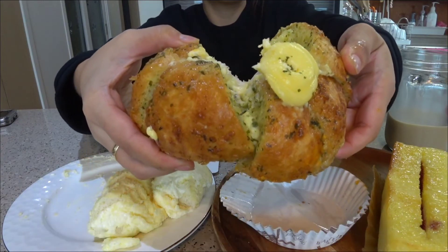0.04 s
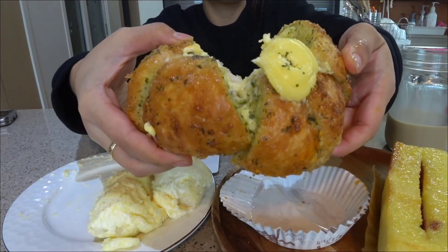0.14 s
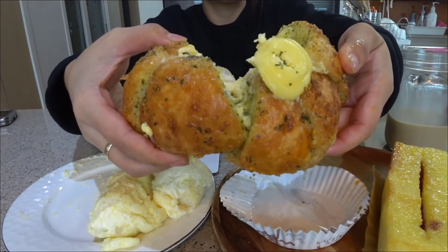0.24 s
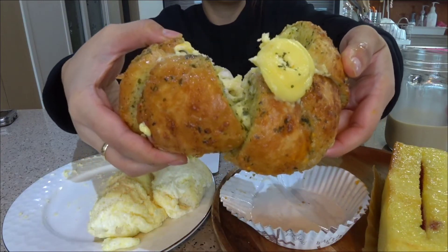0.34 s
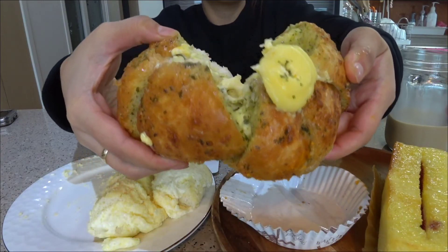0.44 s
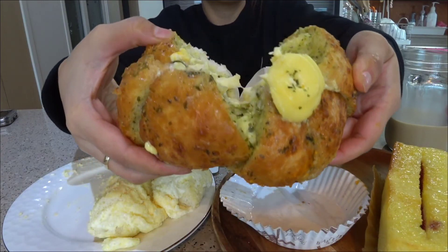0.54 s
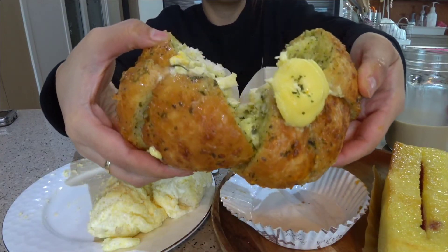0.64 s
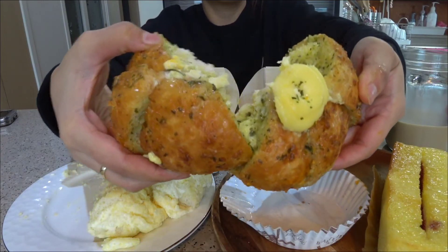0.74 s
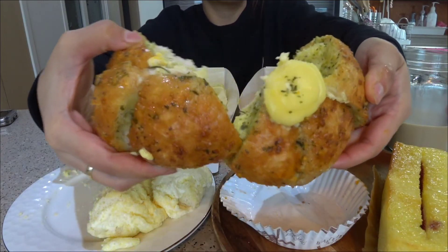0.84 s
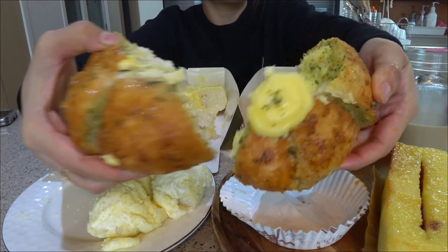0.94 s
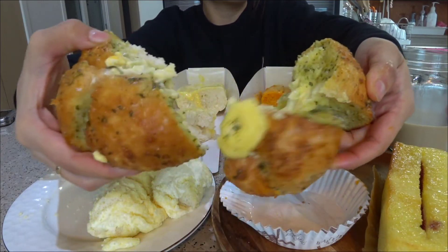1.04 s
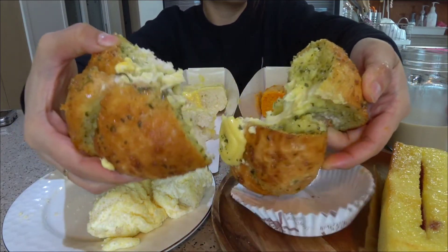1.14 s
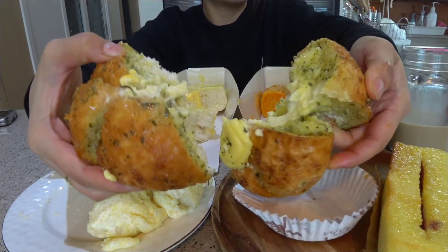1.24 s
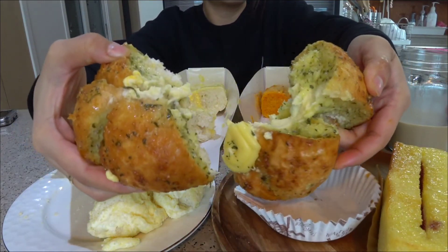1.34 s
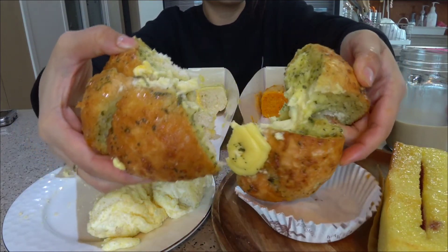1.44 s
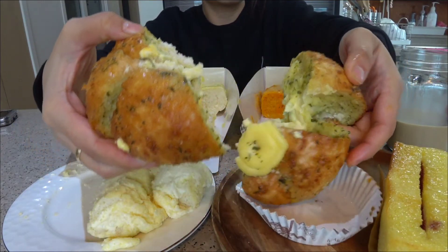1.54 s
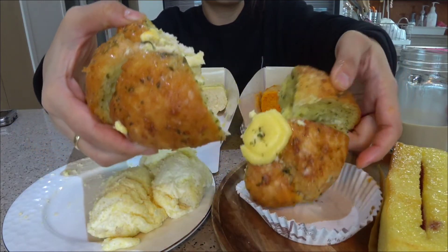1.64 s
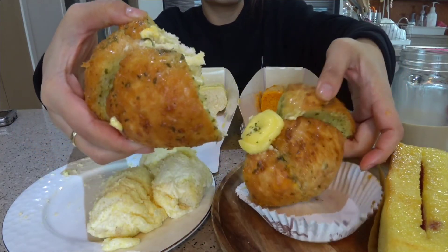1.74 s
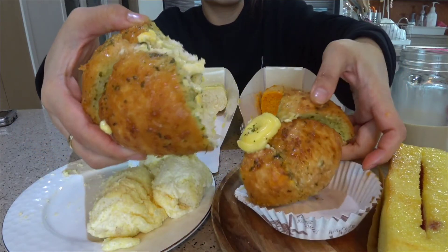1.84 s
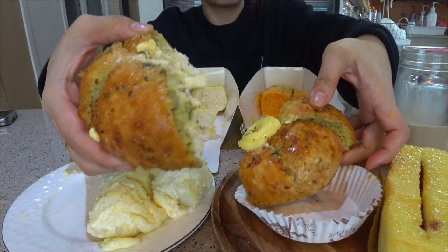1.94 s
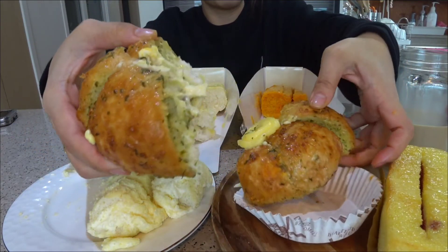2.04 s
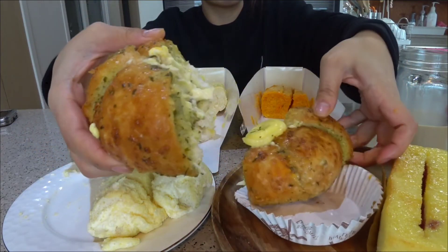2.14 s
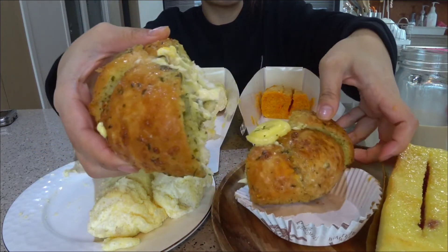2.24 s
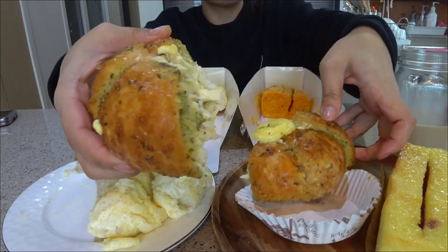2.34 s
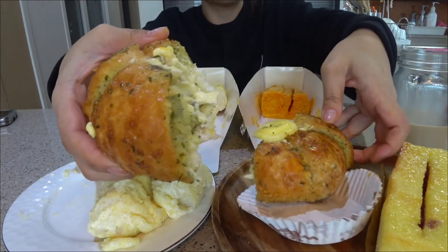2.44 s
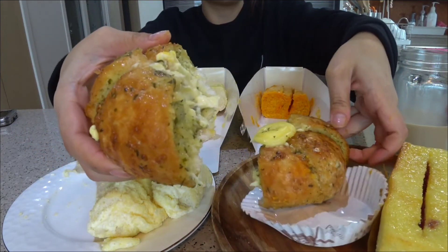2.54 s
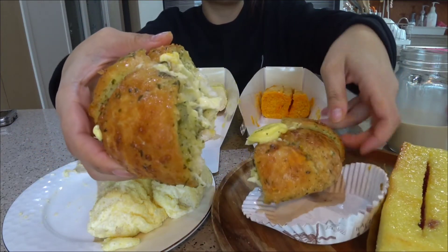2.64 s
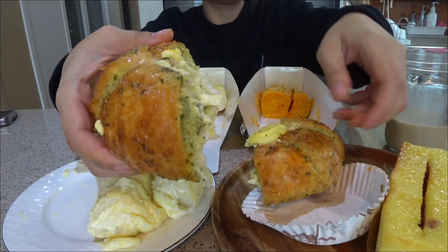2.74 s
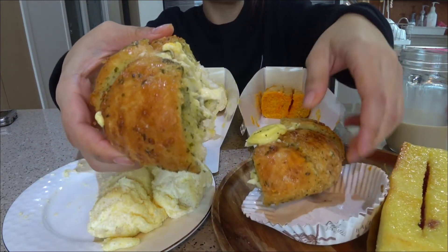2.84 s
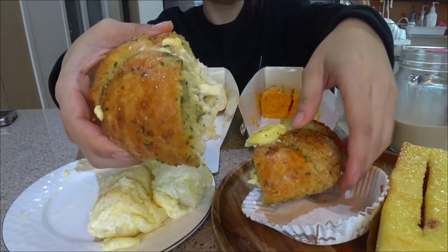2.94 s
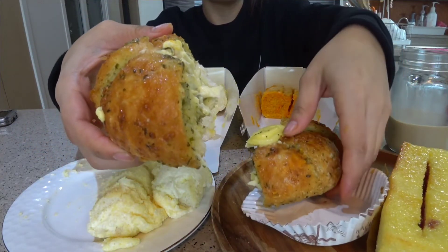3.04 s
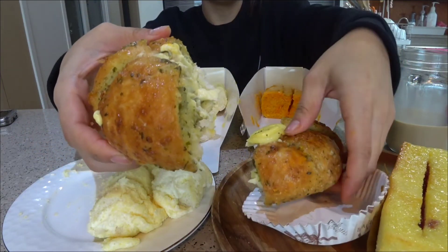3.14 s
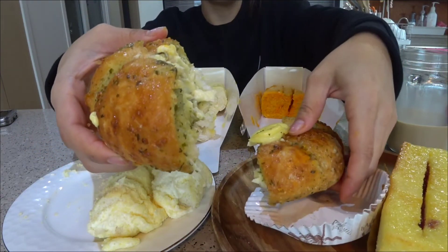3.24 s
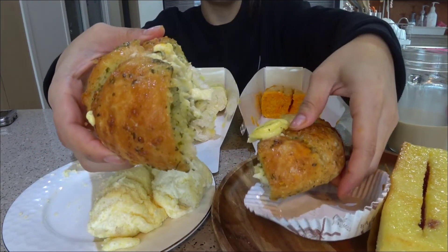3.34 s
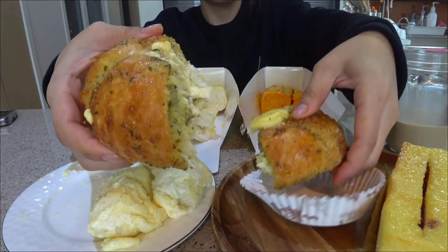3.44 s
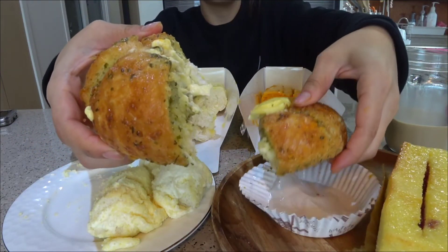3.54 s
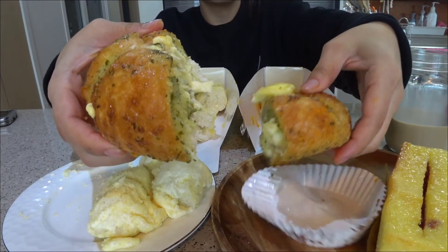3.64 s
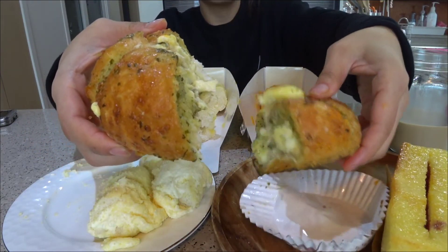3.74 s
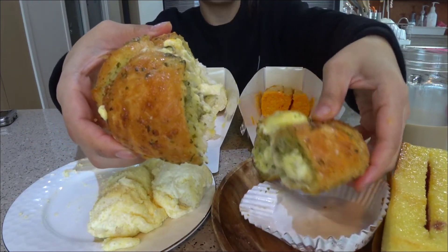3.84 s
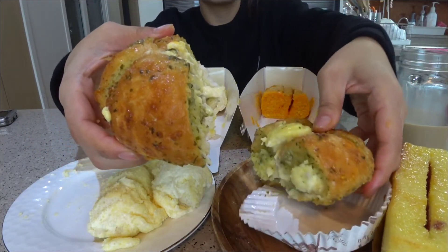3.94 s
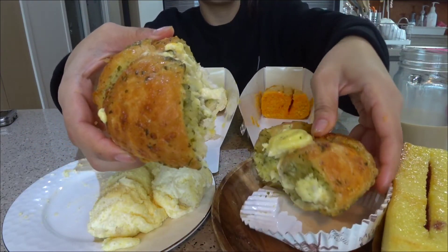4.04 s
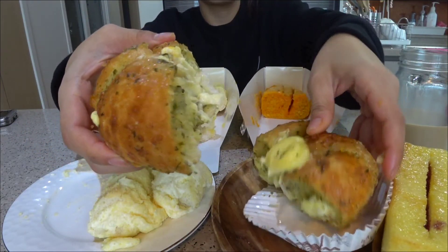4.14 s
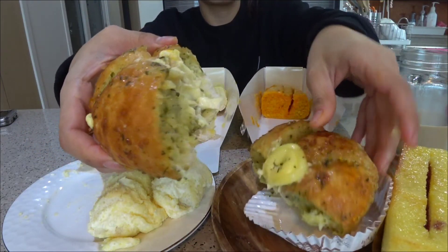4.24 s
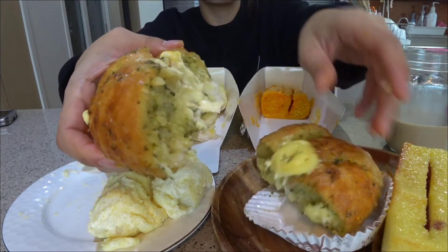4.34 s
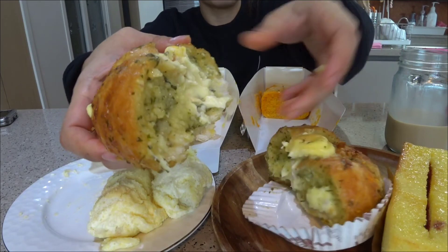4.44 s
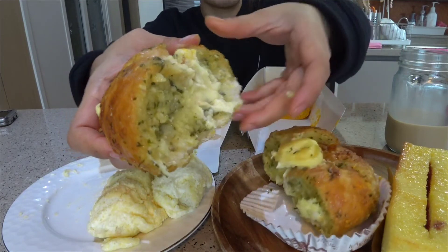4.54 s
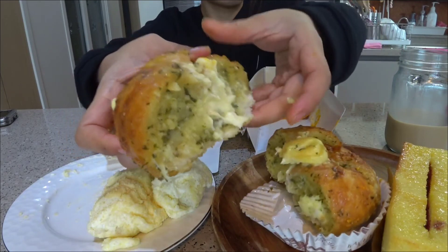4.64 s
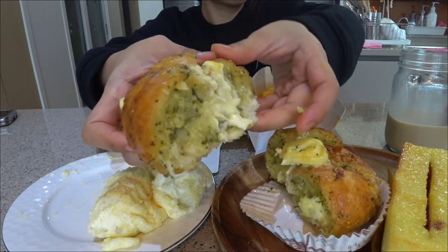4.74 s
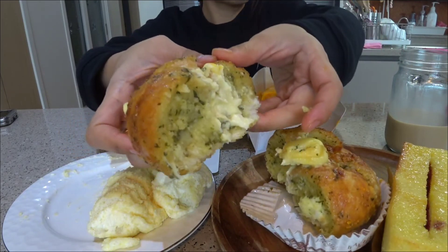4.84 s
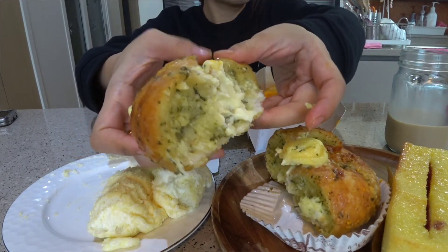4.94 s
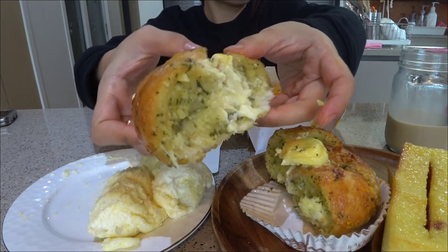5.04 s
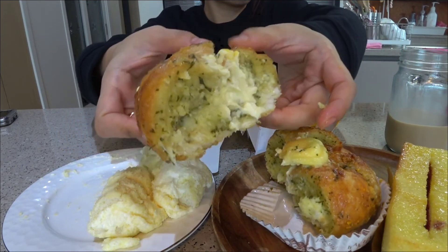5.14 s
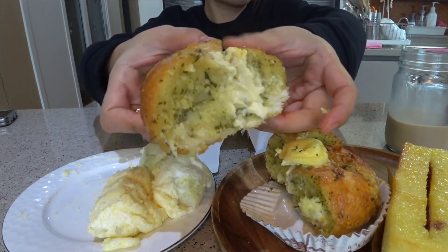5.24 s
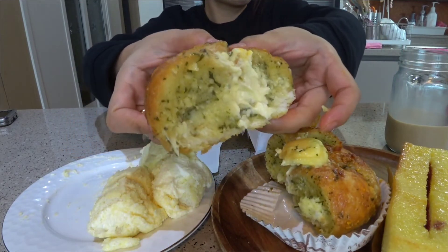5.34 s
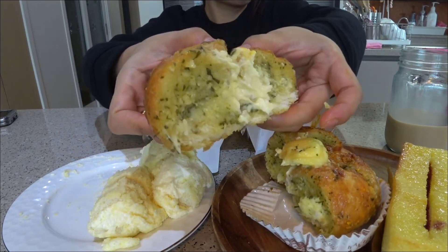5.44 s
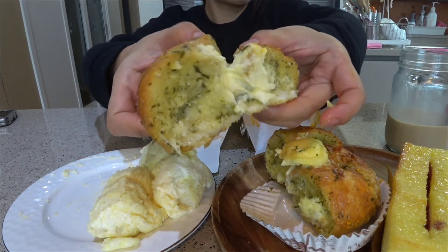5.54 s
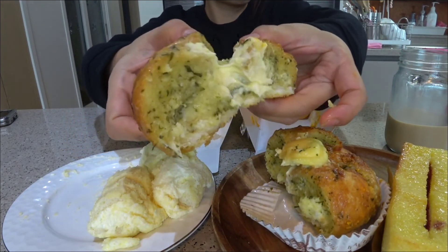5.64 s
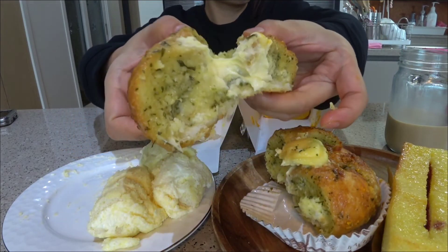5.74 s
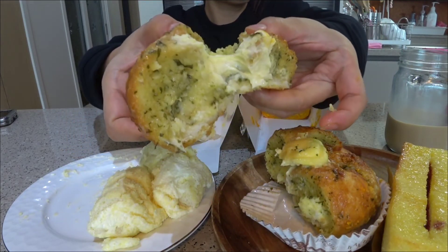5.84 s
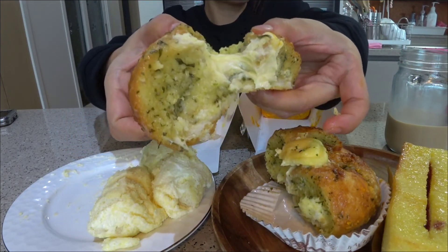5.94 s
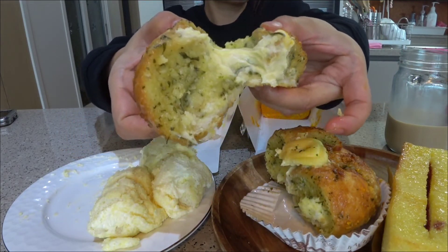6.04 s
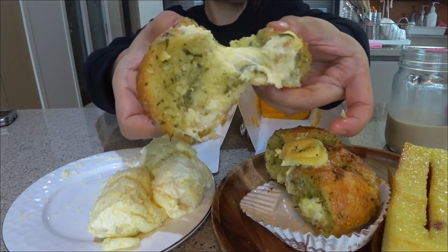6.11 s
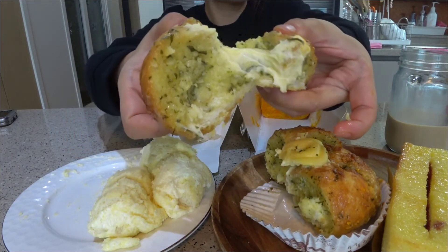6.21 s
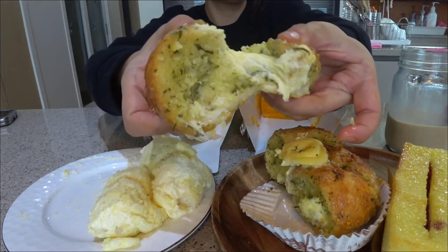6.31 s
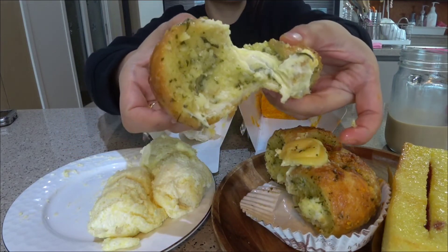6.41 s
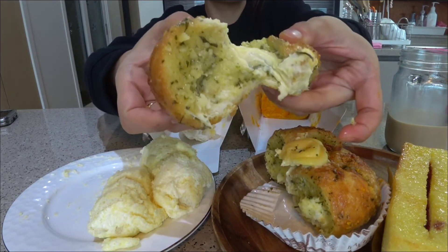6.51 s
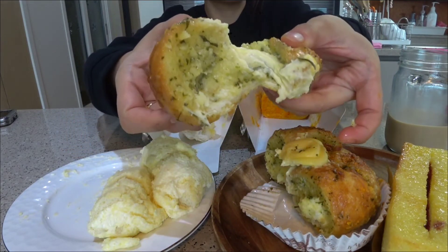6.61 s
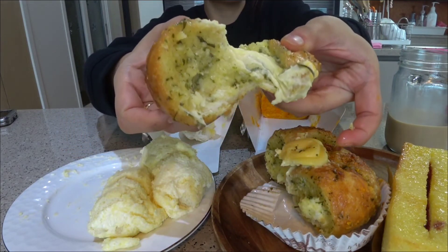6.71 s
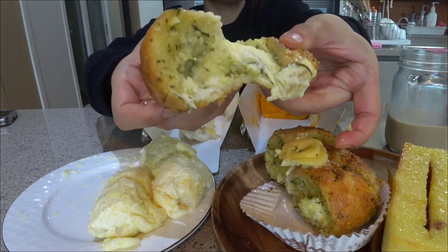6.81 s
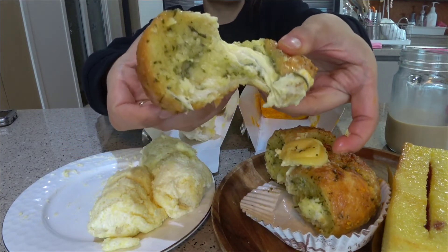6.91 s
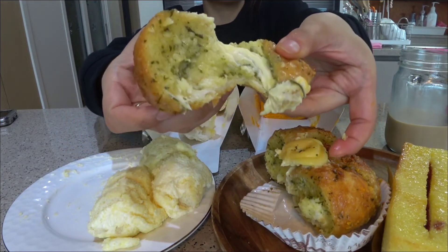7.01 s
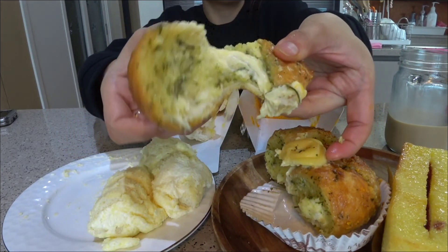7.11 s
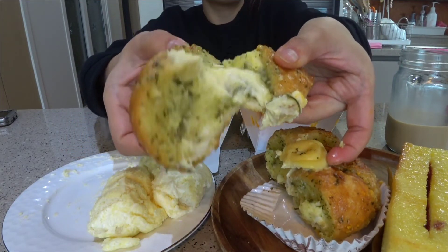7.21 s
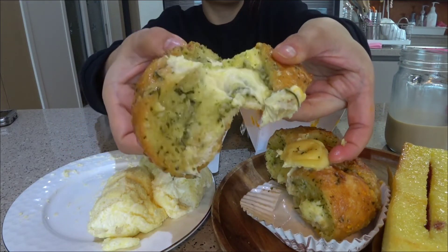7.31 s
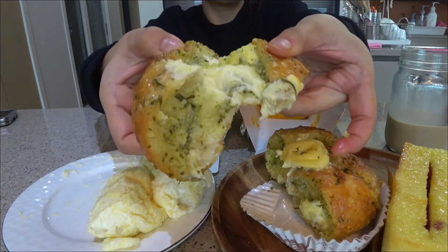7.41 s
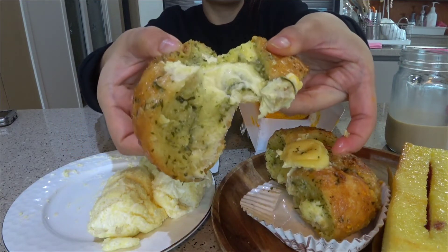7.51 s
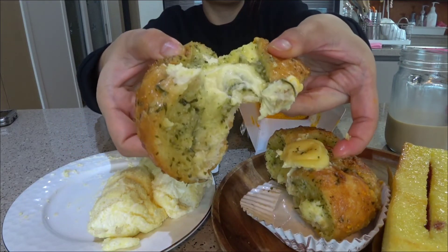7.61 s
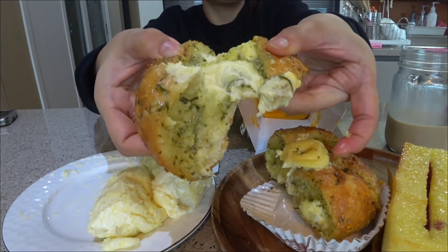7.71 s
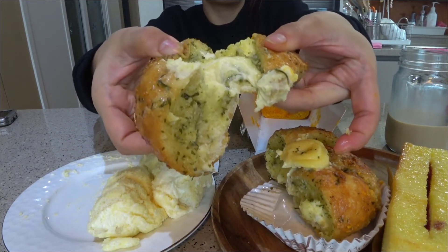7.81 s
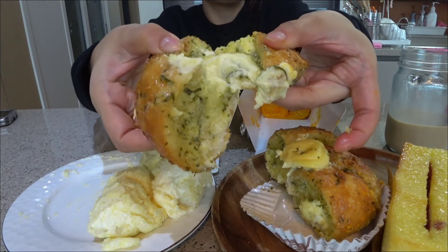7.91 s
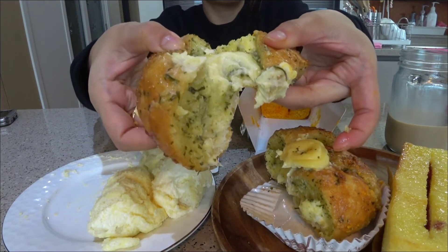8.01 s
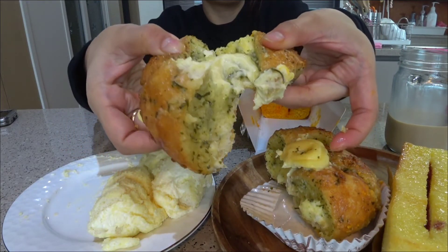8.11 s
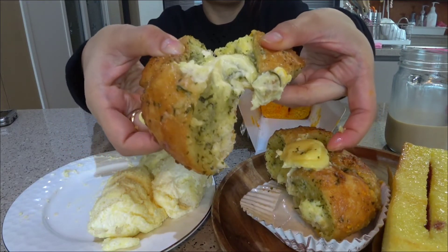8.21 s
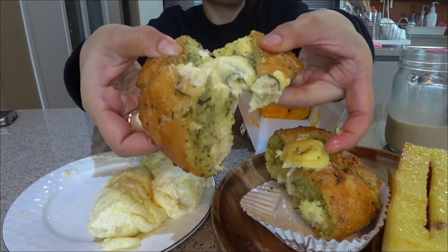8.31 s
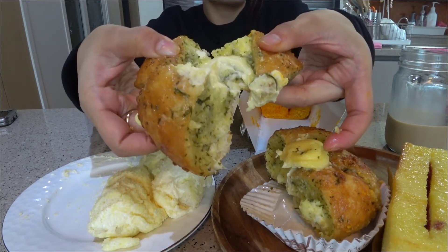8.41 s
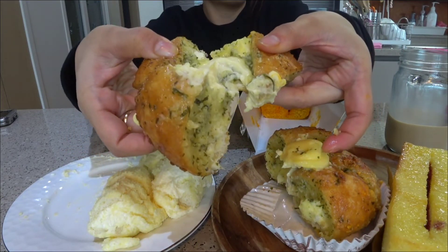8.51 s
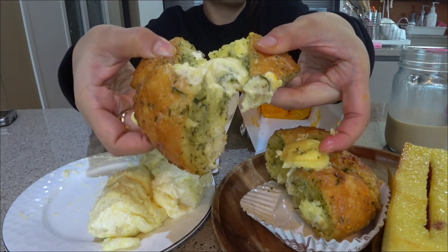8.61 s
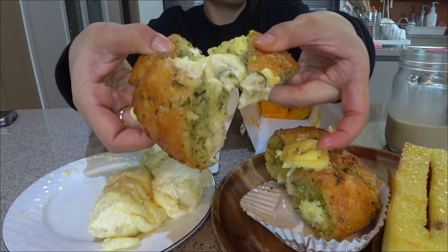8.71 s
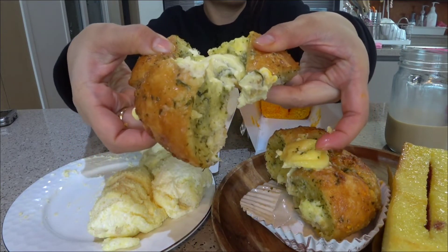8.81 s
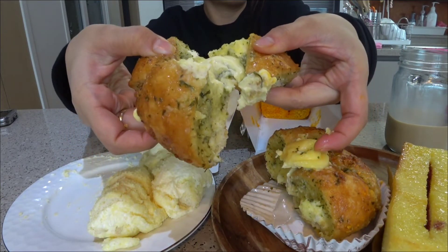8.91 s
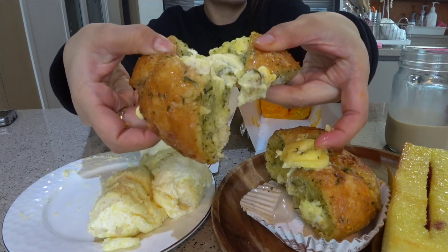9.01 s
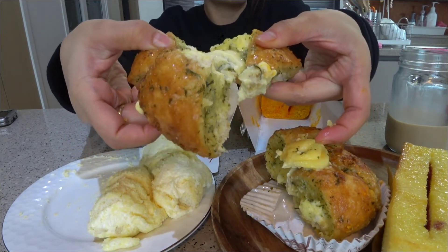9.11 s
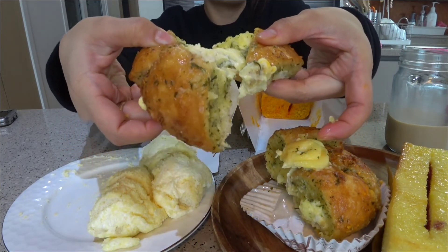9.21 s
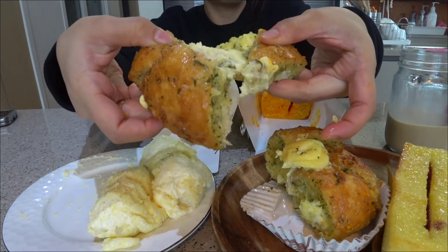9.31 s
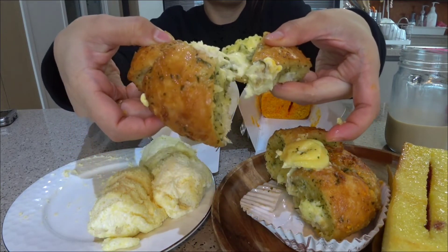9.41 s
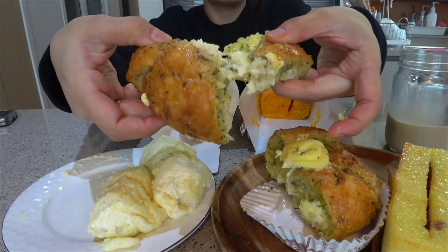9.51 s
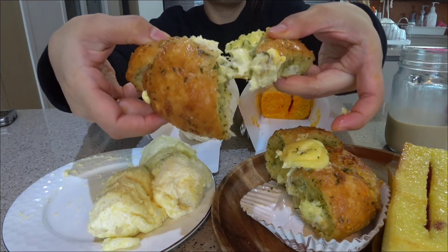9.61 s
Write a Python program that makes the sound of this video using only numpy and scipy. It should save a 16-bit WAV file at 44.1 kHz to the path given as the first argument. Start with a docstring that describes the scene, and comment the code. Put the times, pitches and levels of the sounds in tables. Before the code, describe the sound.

A quiet kitchen with steady soft room noise and a faint low appliance hum; everything else is small, dry and very close, with only a short blur of reflections. From 0 to 0.8 s, faint crumb fizz and tiny high crust ticks; at 0.85-1.05 s they thicken into a brisk crackle as the loaf parts. At 1.2 s a pleated paper liner takes over, much louder: a sharp bright snap near 1.24, scrapes and crinkles, the strongest snaps at 2.13-2.18, then lighter rustling. After a lull around 2.8-3.05 it resumes, with pops near 3.62, scrapes to 4.1 and final snaps at 4.5-4.57, plus faint dull dish bumps. From 4.7 s, soft finger rubs and sparse delicate ticks, busier at 5.6-7, clearer clicks near 7.5, 7.9 and 8.5, and a small rub and crack cluster at 9.3-9.45 before fading to room tone.

```python
"""Tiny ticks of cracking crust and a fizz of parting crumb: hands tear a crusty loaf close by.
One half is set down and turned in a pleated paper liner to the right, which scrapes in short slips and snaps.
A quiet kitchen hums behind. Scrapes, fizz and room are coloured gritty noise; cracks, snaps and bumps are
damped rings started by a click or bare; a short blur of reflections surrounds the hands."""
import sys
import numpy as np
from scipy import signal
from scipy.fft import rfft, irfft, next_fast_len
from scipy.io import wavfile
from scipy.ndimage import uniform_filter1d

SR = 44100
rng = np.random.default_rng(int(sys.argv[2]) if len(sys.argv) > 2 else 0)


def wrap_up_sound(samples):
    """Save the sound to the file named by the first command line argument, as 16-bit audio."""
    columns = np.atleast_2d(samples).T
    # keep every value between -1 and 1, then stretch to whole-number steps
    tamed = np.clip(columns, -1, 1)
    steps = np.round(tamed * 32767).astype(np.int16)
    wavfile.write(sys.argv[1], SR, steps)


N = 426006

# scrapes of crust on paper, fingers or crust:
# (time of the top [s], level [dB], rise [s], fall [s], hiss over body [dB])
SLIPS = [(0.869, -52, 0.007, 0.012, 5), (0.935, -48, 0.036, 0.049, 6), (0.992, -47, 0.0078, 0.0038, 2),
         (1.022, -51.5, 0.012, 0.003, -6), (1.2, -41, 0.0022, 0.077, 1), (1.216, -35, 0.0082, 0.036, 25),
         (1.244, -31, 0.024, 0.0043, 5.5), (1.26, -37, 0.0022, 0.0098, 11), (1.29, -52, 0.02, 0.03, -5),
         (1.347, -46, 0.021, 0.01, 6), (1.4, -46, 0.034, 0.015, -1.5), (1.455, -49, 0.023, 0.02, -2),
         (1.505, -48, 0.0073, 0.0054, 2), (1.529, -51.5, 0.014, 0.011, -3.5),
         (1.601, -44, 0.038, 0.02, -2.5), (1.66, -58, 0.044, 0.08, -9), (1.798, -40, 0.017, 0.0068, -1.5),
         (1.82, -57, 0.023, 0.047, -11), (1.887, -40.5, 0.014, 0.01, 4), (1.92, -57.5, 0.045, 0.043, -6),
         (2.008, -44.5, 0.031, 0.035, 2), (2.088, -55.5, 0.072, 0.024, 4.5),
         (2.112, -48, 0.0076, 0.012, 17), (2.147, -37, 0.029, 0.026, 6), (2.163, -34.5, 0.0091, 0.008, -6),
         (2.19, -43.5, 0.038, 0.045, -4), (2.267, -46, 0.011, 0.047, 0), (2.396, -51.5, 0.012, 0.017, -3),
         (2.439, -51.5, 0.019, 0.19, 0.5), (2.537, -45, 0.0045, 0.0081, -1),
         (2.589, -42.5, 0.051, 0.046, -0.5), (2.661, -42, 0.024, 0.038, -2.5),
         (2.738, -48, 0.024, 0.02, -7.5), (2.782, -45, 0.013, 0.006, -2.5),
         (2.802, -52.5, 0.008, 0.0098, -7), (3.063, -41.5, 0.007, 0.023, 5.5),
         (3.123, -45, 0.002, 0.016, -11), (3.132, -51.5, 0.053, 0.057, 0.5),
         (3.271, -56.5, 0.042, 0.012, -3), (3.322, -52, 0.035, 0.03, 0.5), (3.402, -53, 0.004, 0.013, -7),
         (3.434, -53, 0.052, 0.03, -1.5), (3.505, -48, 0.022, 0.11, 1.5), (3.62, -37, 0.0021, 0.012, -2.5),
         (3.647, -41, 0.014, 0.005, -4), (3.67, -54, 0.037, 0.049, -25), (3.735, -42.5, 0.002, 0.0045, -3),
         (3.76, -39, 0.017, 0.077, 3), (3.905, -38, 0.01, 0.0036, 4), (3.922, -36.5, 0.0036, 0.012, 2.5),
         (3.952, -51, 0.0051, 0.008, -1), (3.989, -47, 0.02, 0.06, 0.5), (4.048, -36.5, 0.007, 0.0059, 9),
         (4.084, -53, 0.013, 0.074, 3), (4.174, -45.5, 0.0069, 0.0022, 1), (4.19, -55.5, 0.03, 0.059, 2),
         (4.277, -40.5, 0.028, 0.015, -1), (4.312, -54.5, 0.0096, 0.024, -4),
         (4.354, -53.5, 0.013, 0.018, 0.5), (4.481, -52, 0.003, 0.005, -17),
         (4.514, -40, 0.015, 0.0055, -2.5), (4.544, -49.5, 0.041, 0.049, 1.5),
         (4.583, -41.5, 0.006, 0.025, -2), (4.62, -49.5, 0.03, 0.032, -5), (4.69, -56, 0.0036, 0.006, 2),
         (4.7, -62.5, 0.03, 0.067, -10), (7.3, -48, 0.008, 0.027, 0)]


def amp(db):
    """Decibels to a linear gain."""
    return 10 ** (np.asarray(db) / 20)


def unit(x):
    """Scale to rms 1."""
    return x / np.sqrt(np.mean(x ** 2) + 1e-20)


def along(points, hz):
    """Read a curve of (frequency [Hz], value) points on a log frequency axis."""
    f, value = np.transpose(points)
    return np.interp(np.log(hz + 1), np.log(f + 1), value)


def filtered(x, response):
    """Filter x by a complex response of frequency."""
    size = next_fast_len(N + 8192)
    hz = np.fft.rfftfreq(size, 1 / SR)
    return irfft(rfft(x, size) * response(hz), size)[..., :N]


def coloured(x, spectrum):
    """Give x a spectrum in dB and rms 1."""
    return unit(filtered(x, lambda hz: amp(along(spectrum, hz))))


def grit(grain_db, patchy_db):
    """Two noises made of uneven sub-millisecond catches, with patches of random gain in time and pitch."""
    catches = amp(grain_db * unit(uniform_filter1d(rng.standard_normal(N), size=40)))
    bins = signal.stft(catches * rng.standard_normal((2, N)), nperseg=256)[2]
    patches = rng.standard_normal(bins.shape[1:])
    patches = uniform_filter1d(patches, size=4, axis=0)  # across pitch
    patches = uniform_filter1d(patches, size=14, axis=1)  # across time
    return signal.istft(bins * amp(patchy_db * unit(patches)), nperseg=256)[1][:, :N]


def ticks(s, db, hz, t60, crack, crack_t60, overtone, low_share):
    """Damped rings with one overtone, started by a broad crack; too small to radiate well below their pitch."""
    t = np.arange(600) / SR
    phase = 2 * np.pi * hz[:, None] * t
    ring = amp(-60 * t / t60[:, None]) * (np.sin(phase) + overtone * np.sin(1.69 * phase))
    noise = uniform_filter1d(rng.standard_normal((len(s), len(t))), size=2)  # duller in the top octave
    burst = crack * amp(-60 * t / crack_t60) * noise
    onset = 1 - np.exp(-t / 0.000085)
    f = np.fft.rfftfreq(len(t), 1 / SR)
    radiated = (1j * f / (low_share * hz[:, None] + 1j * f)) ** 4
    softened = (1 + 1j * f / 13000) ** 2
    shape = irfft(rfft(onset * (ring + burst)) * radiated / softened)
    shape *= (amp(db) / np.abs(shape).max(axis=1))[:, None]  # db is the peak
    at = np.round(s * SR).astype(int)[:, None] + np.arange(len(t))
    return np.bincount(at.ravel(), shape.ravel(), N + len(t))[:N]


def kitchen():
    """Steady room noise from all around, wider than the loaf, with a few narrow drones in it."""
    # appliances droning: (centre [Hz], half width [Hz], relative level [dB])
    hum = [(215, 4.4, 4), (268, 5.7, 4.5), (360, 5.1, -10), (418, 13.8, -3.5), (577, 12.98, -1),
           (724, 3.3, 3.5)]
    # room tone: (frequency [Hz], relative level per Hz [dB])
    room_colour = [(25, -8.5), (60, -1.5), (85, -15.5), (130, -10.5), (230, -2.5), (380, -0.5), (800, -4.5),
                   (1400, -5.5), (2200, -8), (5000, -13.5), (7600, -10.5), (9500, -19.5), (12000, -13),
                   (16000, -22)]
    # stereo width: (frequency [Hz], side over mid [dB])
    room_width = [(60, -10), (110, -4.5), (200, -7.5), (380, -1.5), (700, 6), (1290, 7.5), (2380, 4),
                  (4400, 1.5), (8120, -1), (15000, -0.5)]
    level_db = -64  # rms over mid and side

    def drones(hz):
        peaks = sum(amp(db) / (1 + ((hz - centre) / width) ** 2) for centre, width, db in hum)
        return 1 + 0.5 * peaks

    mid, side = grit(grain_db=-0.16, patchy_db=0.88)
    side = filtered(side, lambda hz: amp(along(room_width, hz)))
    mid, side = coloured(filtered(np.array([mid, side]), drones), room_colour)
    return amp(level_db) * np.array([mid + side, mid - side])


def table(x):
    """A short blur of reflections from table, plates and body: decaying noise, separate for each ear."""
    t = np.arange(SR // 8) / SR
    t60_s, first_s = 0.099, 0.0015
    tail = rng.standard_normal((2, len(t))) * amp(-60 * t / t60_s) * (t > first_s)
    mono = x.mean(axis=0)[None]
    return signal.fftconvolve(mono, tail / np.linalg.norm(tail[0]), axes=1)[:, :N]


def slip_colour(hz, hiss_db, thud_db, body_hz, hiss_hz):
    """Body, hiss and thud add in power; the rubbed fold lifts two body bands, most in dull slips, and one of hiss."""
    # spectra of the three parts: (frequency [Hz], relative level per Hz [dB])
    body_colour = [(400, -21.5), (800, -2.5), (1500, -2.5), (2500, -4), (3800, -4), (4800, -8),
                   (6500, -35.5)]
    hiss_colour = [(3000, -36), (4600, -7), (6500, -1.5), (8500, -3), (10600, -5.5), (13000, -12),
                   (16500, -15)]
    thud_colour = [(100, -29), (220, -5.5), (400, 4.5), (800, 1.5), (1100, -18.5)]

    def lift(centre, width, db):
        return 1 + amp(db) / (1 + ((hz - centre) / width) ** 2)

    low_lift = lift(body_hz, 220, 4.5 - .3 * hiss_db)
    high_lift = lift(1.74 * body_hz, 200, -6)
    body = unit(amp(along(body_colour, hz)) * low_lift * high_lift)
    hiss = amp(hiss_db) * unit(amp(along(hiss_colour, hz)) * lift(hiss_hz, 360, 0.94))
    thud = amp(thud_db) * unit(amp(along(thud_colour, hz)))
    return np.sqrt((body ** 2 + hiss ** 2 + thud ** 2) / (1 + amp(hiss_db) ** 2))


def paper_scrape():
    """Each slip is a run of catches with its own colour that swells and dies as a lopsided bell."""
    # ring of the fold being rubbed, mostly lower as larger folds take over: (time [s], body ring [Hz])
    fold = [(0.9, 3220), (1.25, 2220), (1.65, 2500), (1.88, 2600), (2.0, 2100), (2.15, 2350), (2.5, 2150),
            (3.1, 2010), (3.42, 1750), (3.52, 2200), (4.3, 2180), (4.55, 1970), (4.62, 1470)]
    hiss_ring_hz, hiss_ring_spread = 7420, 0.11  # the spread is in natural-log pitch
    ripple_db = 1.6  # every slip favours its own scatter of narrow bands
    scrape = np.zeros((2, N))
    catches = unit(grit(grain_db=2.0, patchy_db=2))
    span = np.arange(-12288, 12288)
    lag, hz = span / SR, np.fft.rfftfreq(len(span), 1 / SR)
    for s, db, rise, fall, hiss_db in SLIPS:
        bell = amp(db - 6.73 * (lag / np.where(lag < 0, rise, fall)) ** 2)
        run = catches[:, (rng.integers(N) + span) % N]
        body_hz = np.interp(s, *np.transpose(fold))
        hiss_hz = hiss_ring_hz * np.exp(hiss_ring_spread * rng.normal())
        thud_db = -12 - 0.2245 * (db + 46.5)  # light slips are the thuddier
        scatter = unit(uniform_filter1d(rng.standard_normal(len(hz)), size=150))
        ripple = unit(amp(ripple_db * scatter))
        colour = ripple * slip_colour(hz, hiss_db, thud_db, body_hz, hiss_hz)
        scrape[:, round(s * SR) + span] += bell * irfft(rfft(run) * colour)
    return scrape


def pleats():
    """Pleats buckle: each snap is a broad crack with a short ring."""
    # (time [s], peak [dB], ring [Hz])
    buckles = [(1.1974, -31, 8494), (1.2424, -14, 7194), (1.2633, -30, 7110), (1.2839, -35, 3470),
               (1.398, -35.5, 10200), (1.5056, -36, 4870), (1.594, -27.5, 7800), (1.777, -44, 2480),
               (1.7983, -32, 3020), (1.868, -45, 2523), (1.9622, -37, 13050), (2.1064, -30, 6506),
               (2.12, -29.5, 2370), (2.1304, -8, 2400), (2.1401, -19, 2720), (2.164, -15, 6500),
               (2.1817, -17.5, 6420), (2.3946, -43, 1890), (2.4027, -42, 1550), (2.419, -40, 1530),
               (2.4354, -37.5, 7740), (2.531, -27, 7260), (2.536, -28, 7800), (2.7382, -33, 1800),
               (3.062, -31, 1580), (3.075, -31, 8500), (3.1234, -26, 7540), (3.381, -39, 7650),
               (3.618, -20, 2150), (3.629, -22, 2100), (3.6496, -32, 2150), (3.7338, -38, 7400),
               (3.9013, -26, 7725), (3.935, -39, 2740), (4.0469, -42, 6700), (4.1727, -33, 7442),
               (4.232, -33.5, 2030), (4.2497, -32, 2140), (4.271, -29, 5960), (4.4974, -23.5, 1690),
               (4.5707, -17.5, 2130)]
    s, db, hz = np.transpose(buckles)
    t60 = np.full(len(s), 0.0062)
    return ticks(s, db, hz, t60, crack=0.49, crack_t60=0.013, overtone=0.19, low_share=0.42)


def creases(scrape):
    """Small creases pop at random while the liner is handled, louder under harder rubbing."""
    when, size, pitch = rng.random((900, 3)).T
    first_s, last_s = SLIPS[0][0], SLIPS[-2][0]  # the last slip comes late and alone
    when = when * (last_s - first_s) + first_s
    effort = np.sqrt(np.abs(uniform_filter1d(scrape ** 2, size=441)))  # rms over 10 ms
    effort_db = 20 * np.log10(effort[(when * SR).astype(int)] + 1e-9)
    db = effort_db + 3 - 0.73 * np.log(size + 0.09)
    hz = 1600 * 5.5 ** pitch
    return ticks(when, db, hz, 20 / hz, crack=1.0, crack_t60=0.0033, overtone=0.21, low_share=0.55)


def bumps():
    """The loaf bumps the dish through the paper: low damped rings with a strong overtone and no crack."""
    # (time [s], peak [dB])
    knocks = [(1.212, -48.5), (2.131, -55), (2.739, -51), (3.123, -56), (3.618, -47.5), (4.498, -52),
              (4.571, -50)]
    s, db = np.transpose(knocks)
    hz, t60 = np.full(len(s), 300), np.full(len(s), 0.045)
    return ticks(s, db, hz, t60, crack=0, crack_t60=.005, overtone=0.92, low_share=0.35)


def paper():
    """The liner's snaps, pops and bumps sit centred in its scrape, which spreads wider where the ears differ."""
    # (frequency [Hz], left-right likeness [1 = same])
    alike = [(300, 0.95), (900, 0.865), (2000, 0.8), (7000, 0.89), (11000, 0.8366), (15000, 0.3854)]
    # (frequency [Hz], left over right [dB])
    pan = [(300, 1), (1200, -3), (7000, -3), (13000, 0)]
    scrape = paper_scrape()
    mid = scrape[0] + pleats() + creases(scrape[0]) + bumps()
    # equal-power noises of likeness c have side over mid = tan(arccos(c) / 2)
    side = filtered(scrape[1], lambda hz: np.tan(np.arccos(np.clip(along(alike, hz), -.9, 1)) / 2))
    return filtered(np.array([mid + side, mid - side]), lambda hz: amp(np.outer([.5, -.5], along(pan, hz))))


def rubbing():
    """Fingers shift on the crust: each is a soft swell whose spectrum is moved to its own centre."""
    # (time of the top [s], level [dB], half length [s], centre [Hz])
    shifts = [(0.234, -70, 0.063, 1500), (0.696, -72, 0.09, 1500), (4.732, -65, 0.081, 1410),
              (4.928, -66, 0.11, 1390), (5.198, -62.5, 0.09, 1390), (5.78, -73.5, 0.15, 1300),
              (6.33, -71, 0.13, 1300), (6.95, -67, 0.13, 1310), (7.105, -60, 0.064, 1700),
              (7.334, -62, 0.055, 1400), (7.408, -68, .04, 1700), (7.901, -73, 0.055, 1300),
              (8.127, -73, .1, 1300), (8.511, -68, 0.028, 1300), (8.96, -64, 0.046, 1400),
              (9.133, -65.5, 0.048, 1600), (9.292, -58.5, 0.039, 1160), (9.36, -60, 0.034, 1150),
              (9.425, -59, 0.041, 1500)]
    # spectrum for a centre of 1300 Hz: (frequency [Hz], relative level per Hz [dB])
    rub_colour = [(400, -14.5), (800, -2.5), (1300, 1.5), (1900, -5.5), (2600, -7.5), (5000, -16)]
    out, span = np.zeros((2, N + SR)), np.arange(-8192, 8192)
    skin = unit(grit(grain_db=2.0, patchy_db=3.0))
    hz = np.fft.rfftfreq(len(span), 1 / SR)
    for s, db, half, centre_hz in shifts:
        colour = unit(amp(along(rub_colour, hz * 1300 / centre_hz)))
        run = irfft(rfft(skin[:, (rng.integers(N) + span) % N]) * colour)
        out[:, round(s * SR) + span] += amp(db - 8.2 * (span / SR / half) ** 2) * run
    return out[:, :N]


def crust(s, db, hz):
    """A crack in the crust is a broad click that rings for a few cycles only; big ones reach further down."""
    low_share = np.clip(.3 - .012 * (db + 38.5), .1, .45)[:, None]
    return ticks(s, db, hz, 14 / hz, crack=1.1, crack_t60=0.0048, overtone=0.16, low_share=low_share)


def loaf():
    """The louder cracks stand alone; faint ones swell with the pull, over the fizz of parting crumb."""
    # pull of the hands, one list before and one after the paper is handled: (time [s], crumb fizz [dB])
    pull = [
        [(0.0, -74.5), (0.18, -73), (0.205, -61.5), (0.3, -65.5), (0.45, -71), (0.75, -62.5), (0.86, -65)],
        [(4.72, -72), (4.84, -73.5), (5.34, -80), (5.56, -68.5), (5.95, -74.5), (6.4, -73), (6.82, -67.5),
         (7.13, -68), (7.5, -75.5), (7.7, -68.5), (8.1, -71.5), (8.5, -72), (8.6, -74.5), (9.0, -74),
         (9.25, -68), (9.4, -67.5), (9.44, -61), (9.48, -67), (9.66, -75)],
    ]
    # crumb fizz: (frequency [Hz], relative level per Hz [dB])
    crumb_colour = [(1500, -35.5), (3000, -4.5), (5000, -5), (7400, 3.5), (10000, -4), (16000, -3)]
    # louder crust cracks: (time [s], peak [dB], ring [Hz])
    cracks = [(0.2652, -38, 7640), (0.2773, -42, 7628), (0.307, -44, 10250), (0.3208, -46, 11930),
              (0.348, -47, 8100), (0.4749, -46, 6334), (0.4939, -44, 13960), (0.5114, -42, 11360),
              (0.566, -45, 11700), (0.6123, -42, 8858), (0.6254, -39, 9730), (0.636, -43, 6550),
              (0.6944, -38, 10600), (0.752, -37, 9950), (0.7905, -43, 8300), (0.8104, -41.5, 7800),
              (0.844, -40, 6460), (0.855, -33, 6300), (0.8618, -32.5, 10290), (0.8984, -36, 7190),
              (0.921, -29, 6300), (0.9274, -33, 6670), (0.9405, -34, 7580), (0.9508, -30.5, 10700),
              (0.9746, -35, 6930), (0.9864, -36, 3734), (0.9959, -29, 8636), (1.0128, -33, 7020),
              (1.0236, -34.5, 6300), (1.0874, -47, 11900), (4.896, -48, 11710), (5.1294, -42, 4434),
              (5.5527, -47, 11240), (5.5636, -43.5, 4200), (5.5737, -36, 13570), (5.6355, -43.5, 8550),
              (5.6584, -39.5, 7914), (5.7325, -44, 7540), (5.8516, -45, 4670), (5.8816, -41, 8828),
              (5.9244, -45, 11910), (6.024, -47, 11500), (6.0608, -44, 6790), (6.1459, -40, 12900),
              (6.1868, -39.5, 5150), (6.249, -38, 7750), (6.271, -35.5, 5600), (6.3098, -47, 8291),
              (6.3415, -48, 7280), (6.419, -47, 12400), (6.6289, -43.5, 8100), (6.6905, -43.5, 9700),
              (6.6971, -40.5, 7710), (6.7414, -41.5, 6967), (6.8114, -40, 5250), (6.8229, -38, 11370),
              (6.8335, -39.5, 5130), (6.883, -41.5, 13180), (7.0328, -41.5, 7066), (7.083, -41, 4900),
              (7.231, -44.5, 3010), (7.379, -41.5, 8020), (7.528, -32.5, 10150), (7.6191, -37.5, 6600),
              (7.6596, -48, 5810), (7.6708, -44, 5430), (7.7404, -43, 9002), (7.768, -43, 9300),
              (7.8085, -39.5, 7760), (7.853, -42, 5840), (7.901, -34.5, 5814), (8.017, -49, 7385),
              (8.029, -48, 2930), (8.0742, -43, 6630), (8.0824, -44.5, 7060), (8.1746, -42, 5870),
              (8.28, -46, 3340), (8.4942, -31.5, 5860), (8.755, -45, 5000), (8.7822, -41, 6960),
              (8.794, -47.5, 2534), (8.8995, -46.5, 3380), (8.9068, -51, 2110), (9.0817, -43.5, 6850),
              (9.1593, -44, 7190), (9.184, -44, 6500), (9.2047, -44, 6850), (9.248, -41.5, 7100),
              (9.3238, -44, 8660), (9.4175, -38, 6680), (9.4269, -34, 6638), (9.4337, -31, 7100),
              (9.4438, -36, 6500), (9.4873, -46, 3960), (9.5156, -46, 4277), (9.5896, -45, 7531)]
    now = np.arange(N) / SR
    before, after = pull
    busy = (now > before[-1][0]) & (now < after[0][0])  # the hands are at the paper meanwhile
    fizz = amp(np.interp(now, *np.transpose(np.concatenate(pull))))
    fizz = np.where(busy, 0, fizz)
    soft = fizz * coloured(grit(grain_db=4.5, patchy_db=1.5), crumb_colour) + rubbing()

    when, size, pitch = rng.random((1300, 3)).T
    when = when * (N - 1) / SR
    fizz_db = 20 * np.log10(fizz[(when * SR).astype(int)] + 1e-9)
    faint_db = fizz_db + 10 - 4 * np.log(size + 0.047)
    faint = crust(when, faint_db, 3500 * 3.5 ** pitch)

    mid = soft[0] + crust(*np.transpose(cracks)) + faint
    side = amp(-8) * soft[1]
    return np.array([mid + side, mid - side]) * amp([[-.4], [.4]])  # a touch to the right


def scene():
    """Paper and loaf up close, their reflections 12 dB down, and the kitchen behind."""
    near = paper() + loaf()
    return near + amp(-12.0) * table(near) + kitchen()


def record(dry):
    """The microphone rolls off the bass and keeps next to nothing above its band limit."""
    bass_hz, top_hz = 110, 15900

    def response(hz):
        low_cut = (1j * hz / (bass_hz + 1j * hz)) ** 2
        return low_cut / (1 + (hz / top_hz) ** 120)

    return filtered(dry, response)


dry = scene()
out = record(dry)
wrap_up_sound(out)
```